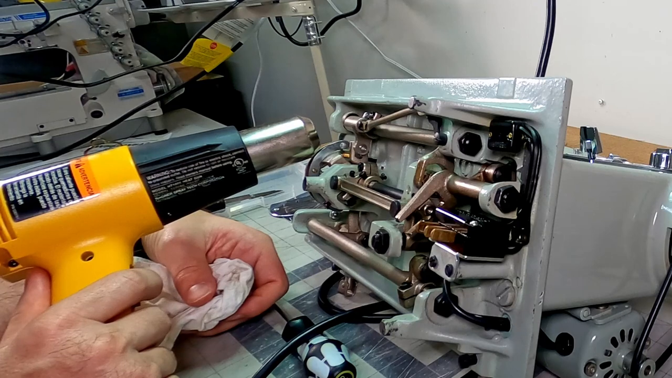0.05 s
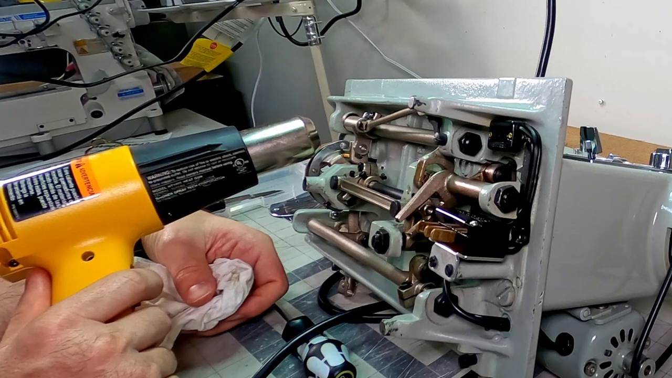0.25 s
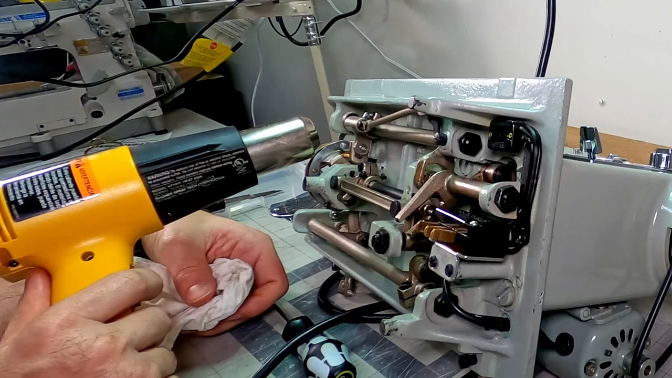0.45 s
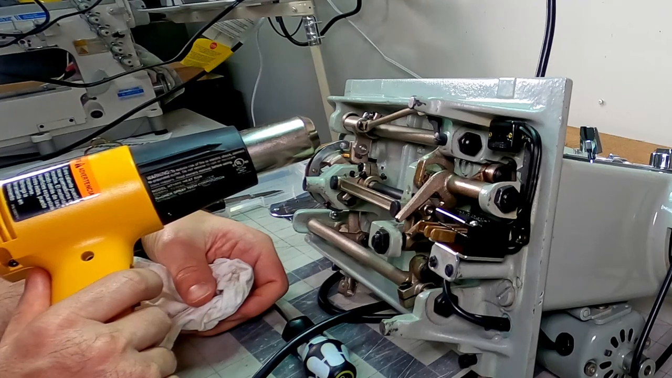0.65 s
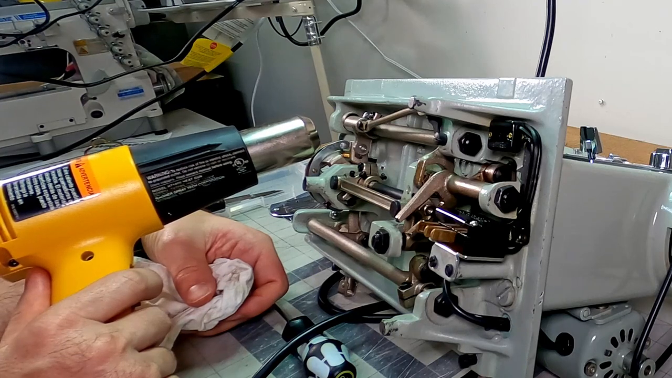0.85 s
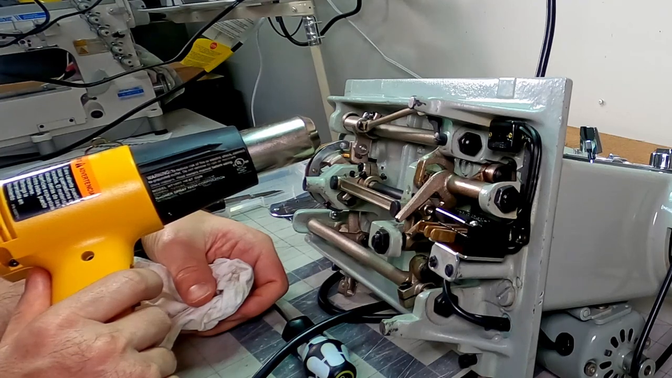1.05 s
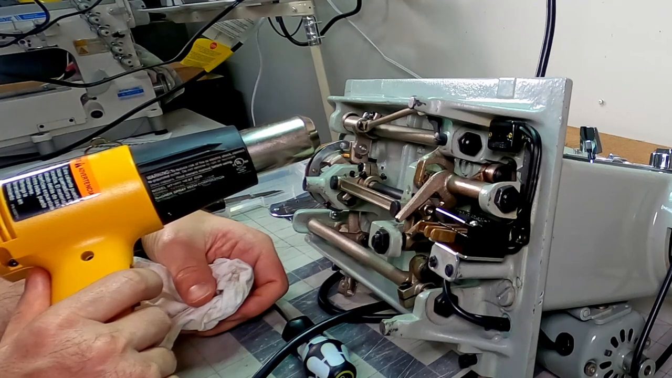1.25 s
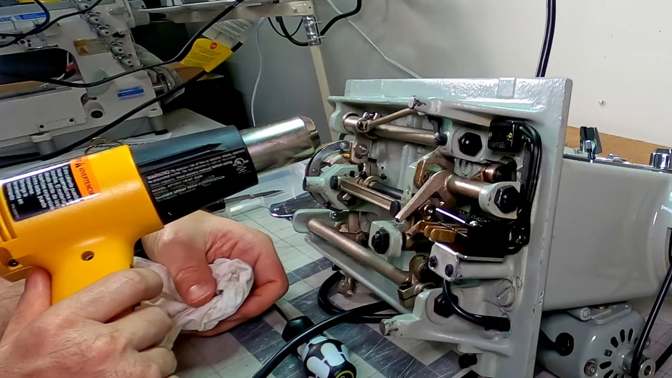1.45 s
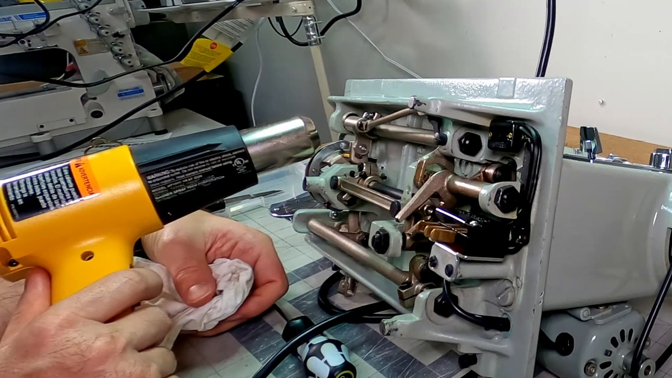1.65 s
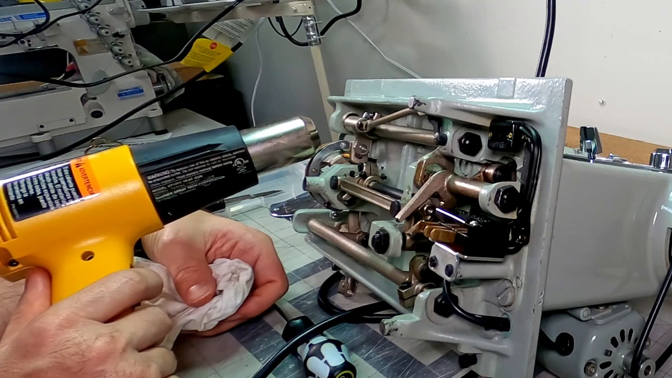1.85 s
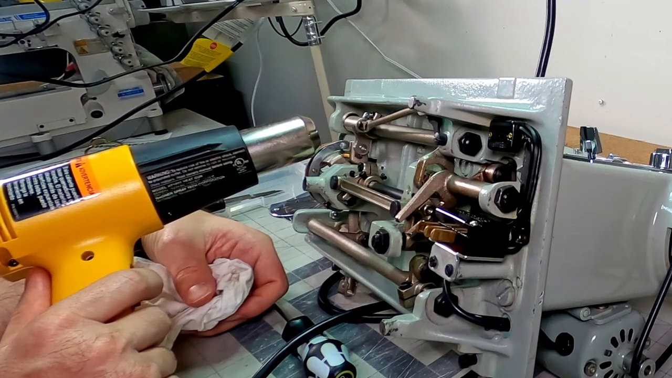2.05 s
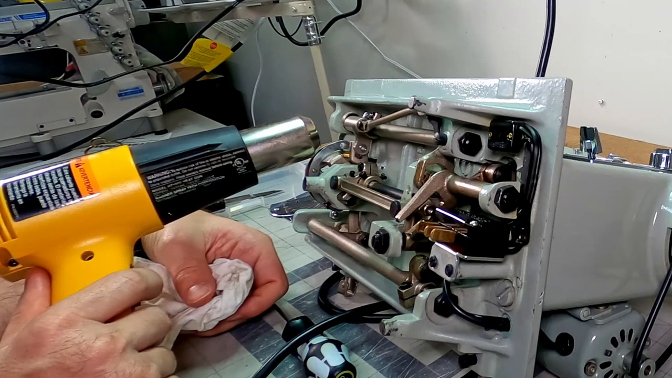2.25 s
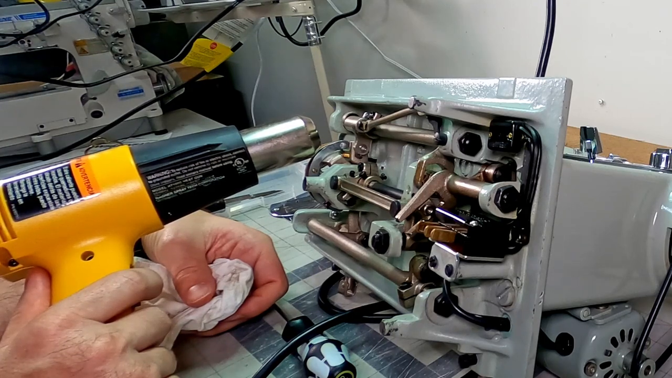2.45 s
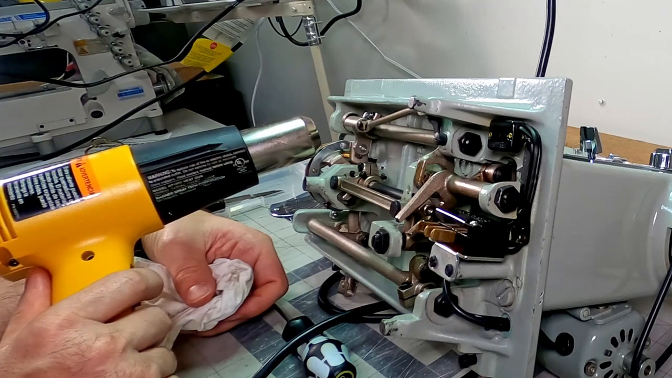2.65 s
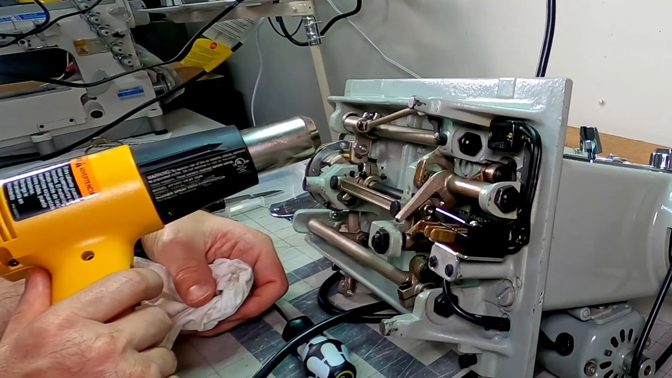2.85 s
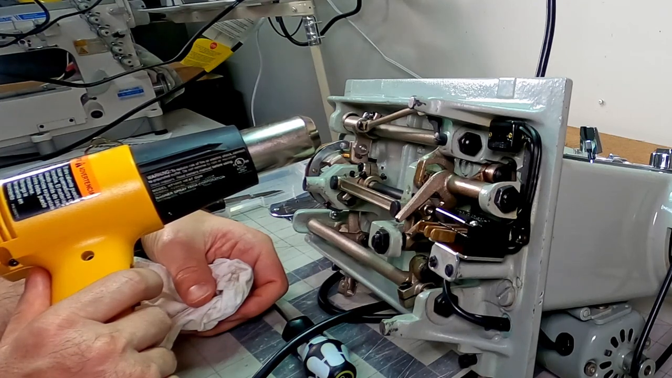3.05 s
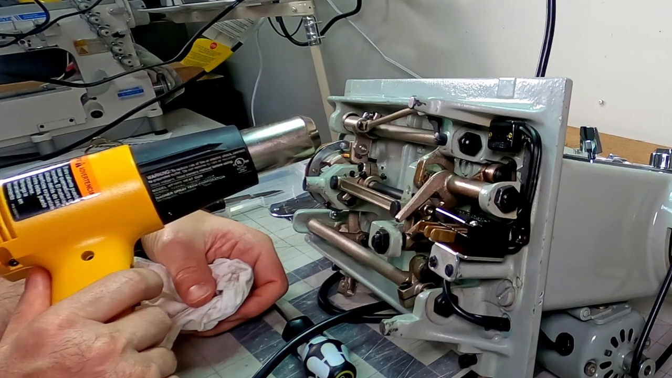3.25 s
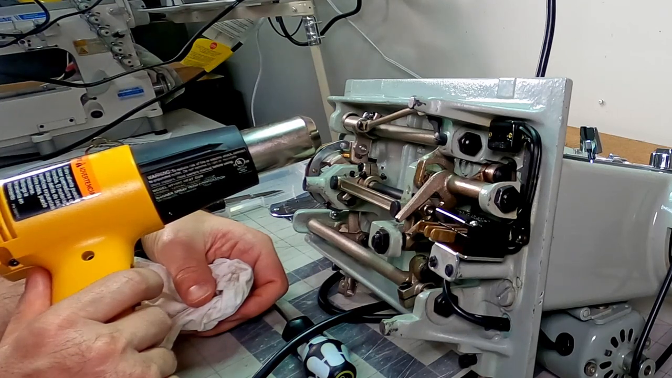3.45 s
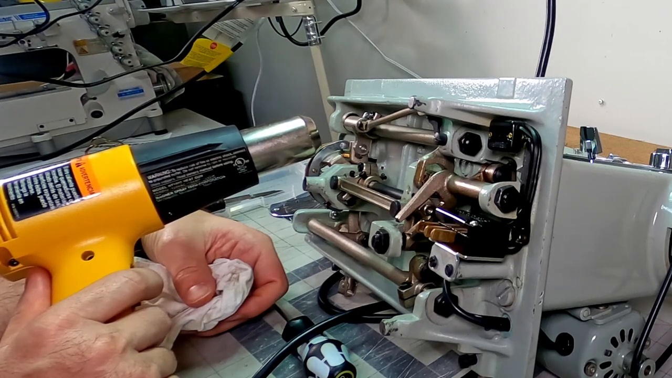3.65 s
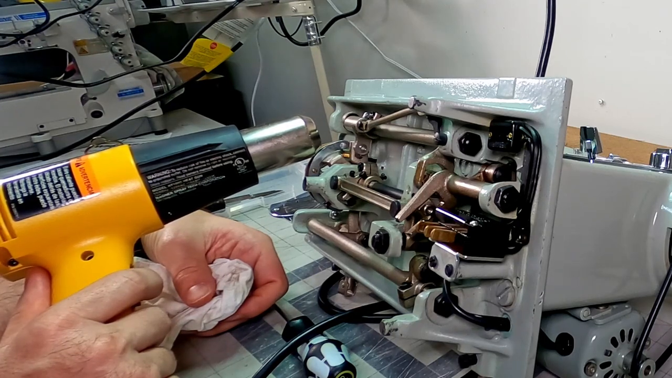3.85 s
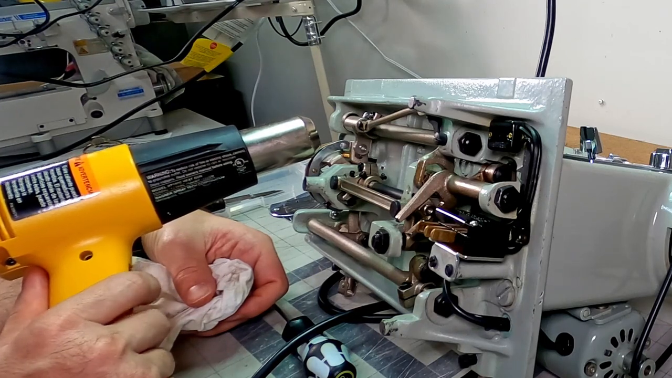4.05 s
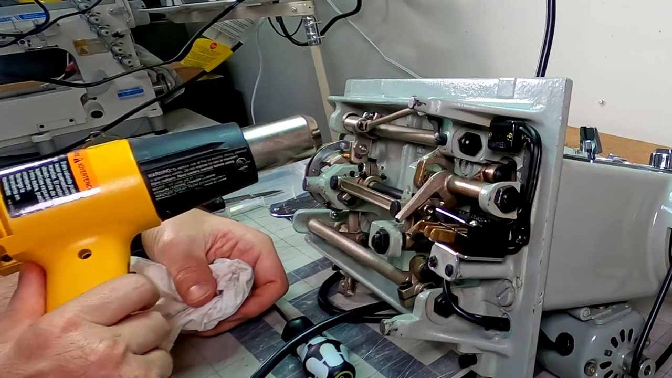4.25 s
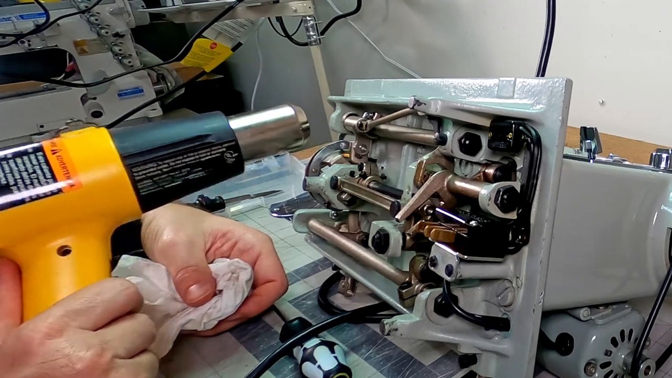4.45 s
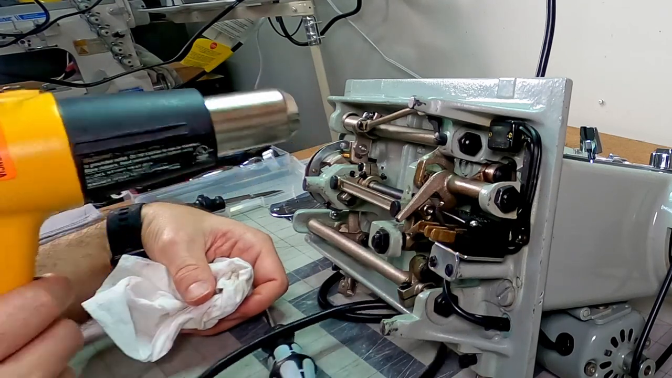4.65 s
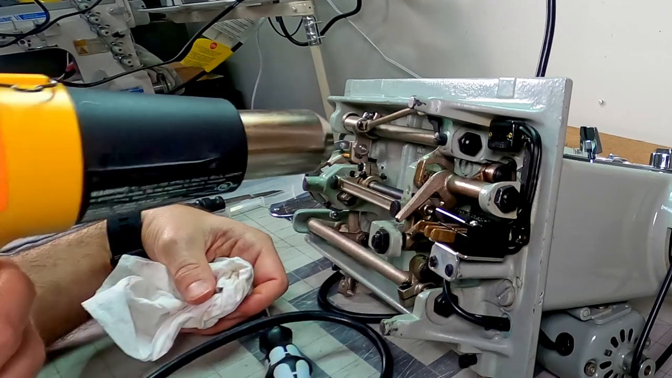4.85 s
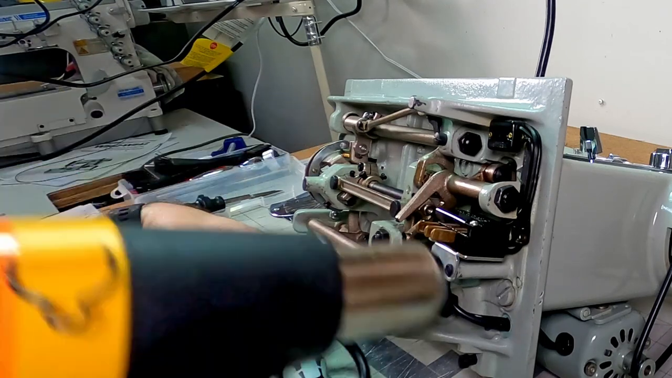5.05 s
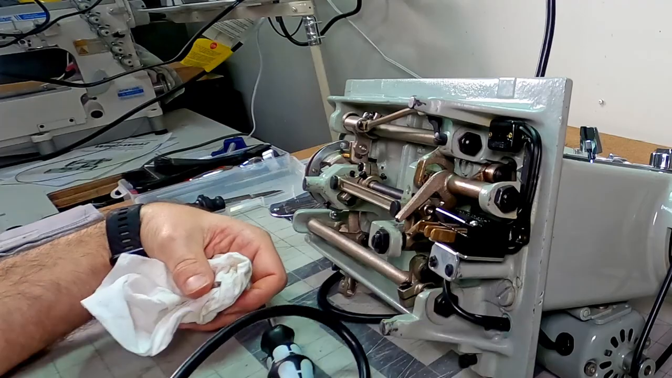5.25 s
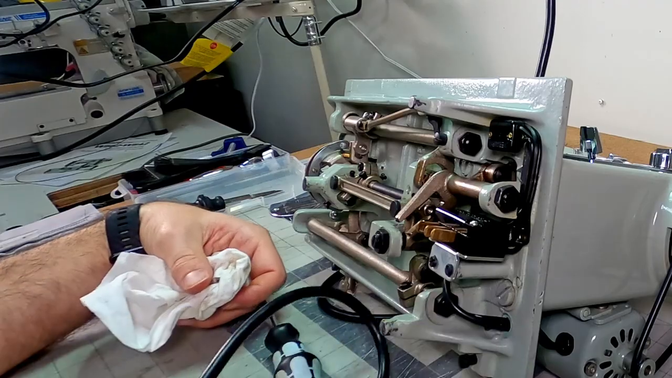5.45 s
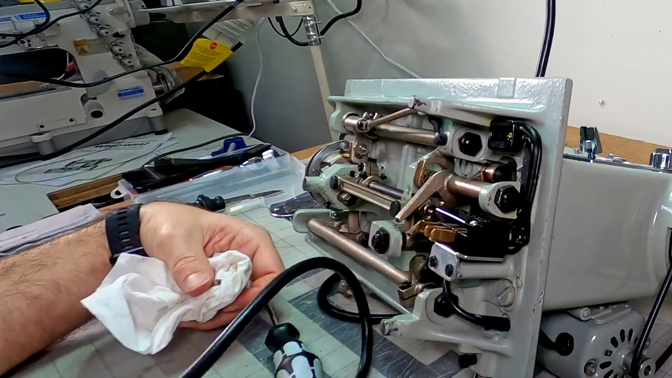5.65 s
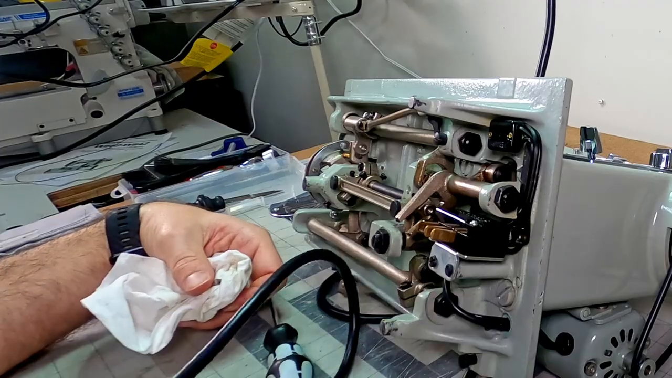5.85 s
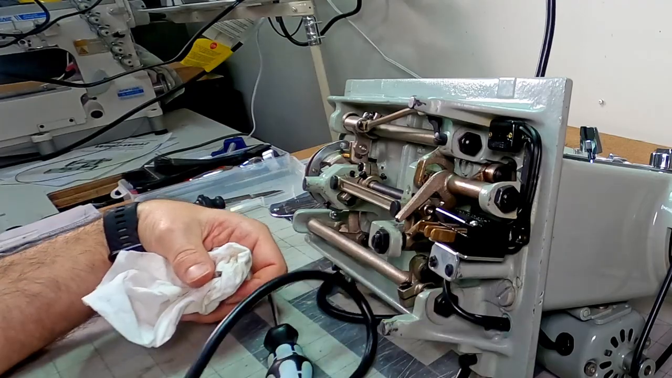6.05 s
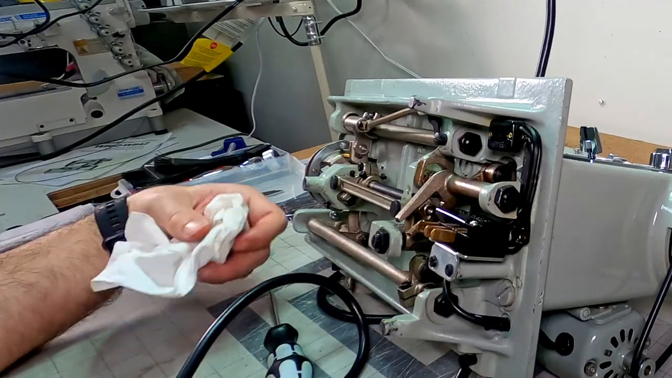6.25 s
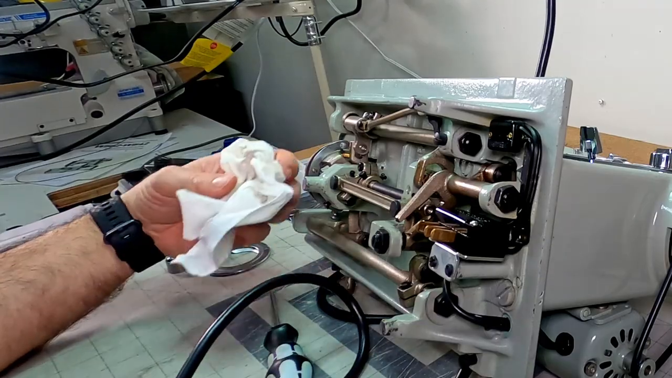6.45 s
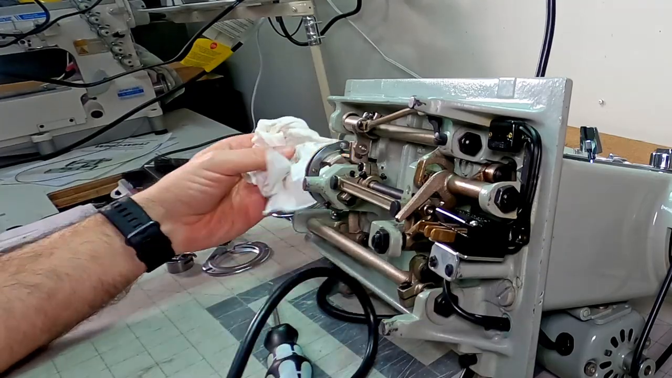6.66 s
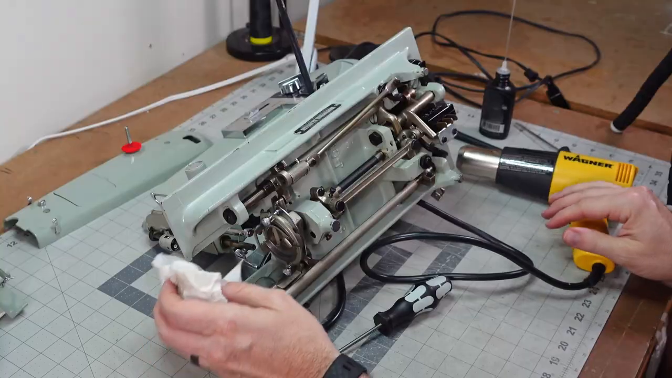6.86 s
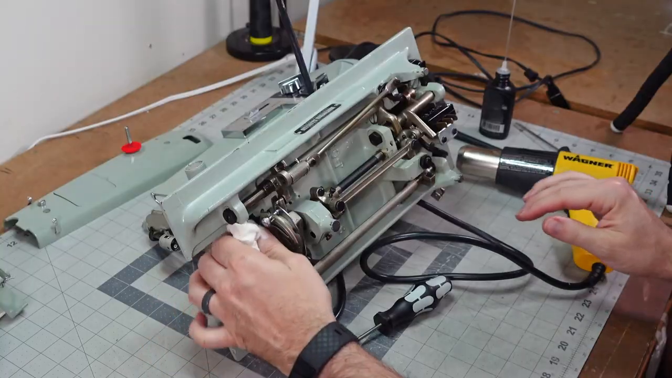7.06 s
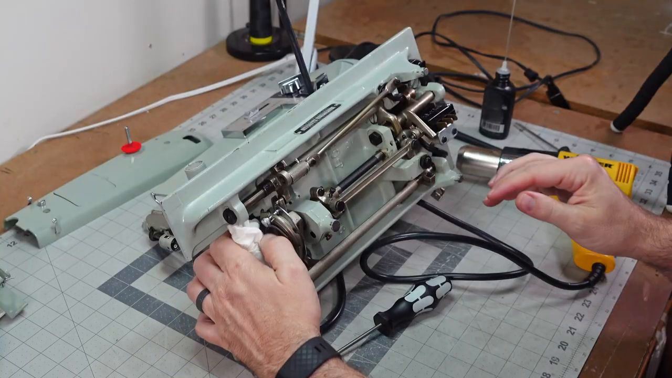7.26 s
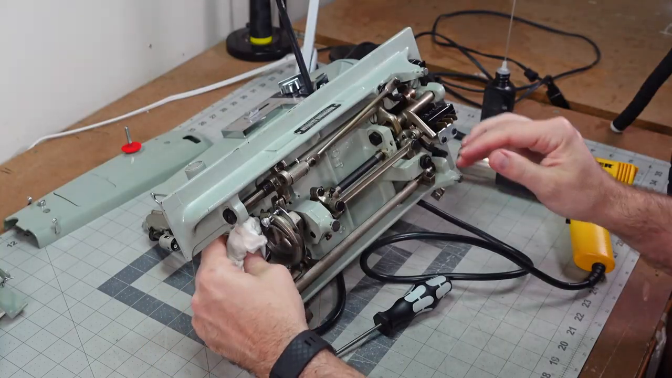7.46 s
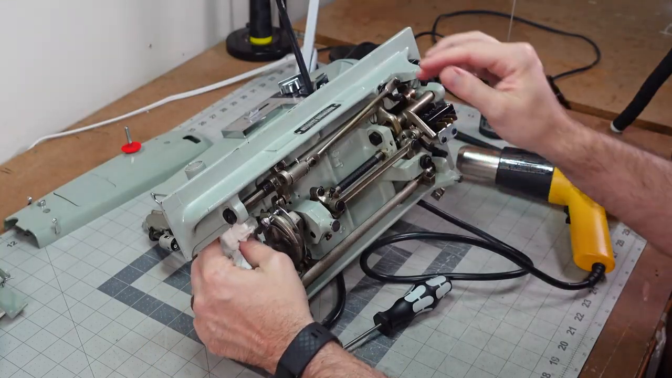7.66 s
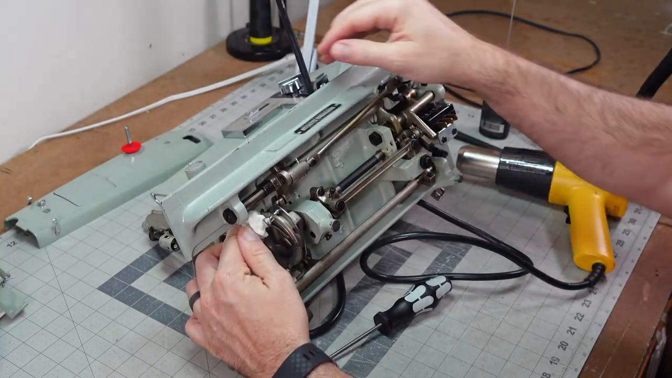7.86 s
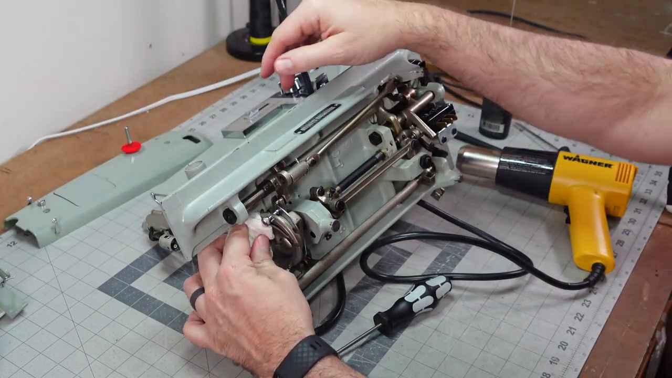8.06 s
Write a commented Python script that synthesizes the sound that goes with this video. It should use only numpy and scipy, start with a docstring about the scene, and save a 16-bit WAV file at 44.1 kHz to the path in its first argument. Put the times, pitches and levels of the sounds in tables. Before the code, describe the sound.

A heat gun blows steadily from the start, a rush of fan air and bright hiss in a plastic housing, with a thin motor whine. At about 4.4 seconds the grip clicks and a steel part ticks. The jet swells as the nozzle swings close past the microphone around 4.7 seconds, and the switch clicks sharply. Just before 5 seconds the motor cuts off and coasts down, its whine falling and fading within a second. A few light metal ticks follow. The gun's case clatters onto the bench at about 5.8 seconds, then gives a firm knock with a low thud at 6.1. From 6 to 8 seconds a tissue rustles softly over metal, with a faint, high, scratchy squeak around 7 seconds, a soft bump and a few more small ticks. A low workshop hum continues throughout, all heard in mono from beside the bench.

```python
"""A heat gun blows steadily at the works of a sewing machine on a workshop bench: fan air and rotor hiss
in a plastic housing, with a thin motor whine. Its jet swells as the nozzle swings close past the
microphone; it is switched off, coasts down and is laid on the bench with a clatter and a knock.
A tissue then rustles and squeaks over the metal. The room hums throughout; one microphone, mono."""
import sys
import numpy as np
from scipy import signal
from scipy.fft import rfft, irfft, next_fast_len
from scipy.io import wavfile
from scipy.ndimage import map_coordinates

SR = 44100
rng = np.random.default_rng(int(sys.argv[2]) if len(sys.argv) > 2 else 0)


def wrap_up_sound(samples):
    """Save the sound to the file named by the first command line argument, as 16-bit audio."""
    columns = np.atleast_2d(samples).T
    # keep every value between -1 and 1, then stretch to whole-number steps
    tamed = np.clip(columns, -1, 1)
    steps = np.round(tamed * 32767).astype(np.int16)
    wavfile.write(sys.argv[1], SR, steps)


N = 358088
TURNS_HZ = 57.97  # the motor at full speed

# broad spectrum of the air in the gun's housing: f/Hz, level/dB
AIR_SPECTRUM = [(200, -25), (460, -21.5), (560, -5), (820, -2.5), (930, -11.5), (1200, -9.5), (1500, -19.5),
                (3400, -26), (6000, -28.5), (9800, -33), (13500, -37.5), (15600, -34)]


def amp(db):
    """Decibels to gain."""
    return 10 ** (np.asarray(db) / 20)


def unit(x):
    """Scale to rms 1."""
    return x / np.sqrt(np.mean(x ** 2) + 1e-20)


def wobble(rate):
    """A smooth random curve, rate knots a second."""
    knots = rng.standard_normal(int(N * rate / SR) + 4)
    return map_coordinates(knots, [np.arange(N) * rate / SR])


def phase(hz):
    """Running phase of a moving frequency."""
    return 2 * np.pi * (np.cumsum(hz) / SR + rng.random())


def colour(x, spectrum, modes=(), tilt=0):
    """Causal filter of unit energy: a broad spectrum, resonances on it and a tilt in dB per octave."""
    m = 2 * next_fast_len(len(x) // 2 + SR // 10)
    hz = np.fft.rfftfreq(m, 1 / SR) + 1
    f, level = np.transpose(spectrum)
    db = np.interp(np.log(hz), np.log(f), level) + tilt * np.log2(np.maximum(hz, f[0]))
    for centre, width, lift in modes:
        db = db + lift * np.exp(-.5 * ((hz - centre) / width) ** 2)
    gain = unit(amp(db) * hz / np.hypot(hz, f[0] / 2))
    cepstrum = irfft(np.log(gain))[:m // 2]
    cepstrum[1:] *= 2  # minimum phase
    return irfft(rfft(x, m) * np.exp(rfft(cepstrum, m)))[:len(x)]


def split(x, hz, side):
    """The part of x below or above hz."""
    return signal.sosfilt(signal.butter(3, hz, side, fs=SR, output='sos'), x)


def rush(spectrum, modes=()):
    """Coloured noise of rms 1."""
    return unit(colour(rng.standard_normal(N), spectrum, modes))


def heat_gun(off_s=4.868, coast_s=.16, stop_s=.9, pass_s=4.71, pass_width_s=.175):
    """One motor drives air, whine and jet; once it is off, drag slows it, then friction stops it."""
    t = np.arange(N) / SR
    coasted = np.maximum(t - off_s, 0)
    friction = np.maximum(1 - (coasted / stop_s) ** 2, 1e-3)
    speed = friction / np.hypot(1, coasted / coast_s)  # share of full speed
    airflow = speed ** 5
    near = np.exp(-.5 * ((t - pass_s) / pass_width_s) ** 2)  # 1 closest to the microphone
    angle = phase(TURNS_HZ * speed * (1 + .0005 * wobble(3) + .0012 * wobble(40)))
    return fan_air(speed, airflow, angle) + motor_whine(speed, angle, near) + nozzle_jet(airflow, near)


def fan_air(speed, airflow, angle, rasp_share=.52, crossover_hz=2800):
    """Air rushes through the housing; in the treble, rotor hiss takes over and outlasts the airflow."""
    # housing resonances: f/Hz, width/Hz, lift/dB
    housing_modes = [(1756, 82, 3), (1912, 215, 8.5), (2517, 146, 6), (2980, 81, 3), (4020, 210, 5),
                     (5830, 450, 3.5), (6700, 98, -7.5), (6966, 380, 6), (7630, 92, 9.5), (8170, 190, 7),
                     (8000, 270, -1), (9230, 140, 3), (11730, 210, 4), (12080, 880, 6.5)]
    flow = rng.standard_normal(N)
    hiss = np.sqrt(1 - rasp_share) * flow + np.sqrt(rasp_share) * rotor_rasp(angle / (2 * np.pi))
    hiss *= 1 + .08 * np.cos(3 * angle)  # three pulses a turn
    body = airflow * split(flow, crossover_hz, 'low')
    treble = speed ** 1.55 * split(hiss, crossover_hz, 'high')
    return amp(-42.5 + .3 * wobble(9)) * colour(body + treble, AIR_SPECTRUM, housing_modes)


def rotor_rasp(turns):
    """The rotor rubs over the same rough track on every turn, so its hiss is a dense stack of lines."""
    track = rng.standard_normal(round(SR / TURNS_HZ))
    return unit(map_coordinates(track, [turns % 1 * len(track)], mode='grid-wrap'))


def motor_whine(speed, angle, near, judder_rad=.75, flutter_db=2.2):
    """Coasting, the motor's orders slide down through the housing's colour; the highest die first."""
    # whine lines: multiple of the turning rate, relative level/dB
    orders = [(15, -50.5), (18, -55), (24, -63), (33, -53.5), (36, -62), (45, -60.5), (51, -70), (60, -71),
              (84, -89), (91, -70.5), (118, -62), (121, -61.5), (124, -91), (202, -79)]
    air_hz, air_db = np.transpose(AIR_SPECTRUM)
    housing_db = lambda hz: np.interp(np.log(hz), np.log(air_hz), air_db)
    whine = 0
    for order, db in orders:
        loss = (1 - speed) * (order - orders[0][0])  # at rest, 1 dB per order above the lowest
        slide = housing_db(order * TURNS_HZ * speed) - housing_db(order * TURNS_HZ)
        gain = amp(db + flutter_db * wobble(45) + slide - loss)
        whine += gain * np.sin(order * angle + judder_rad * wobble(55))
    return np.sqrt(2) * amp(-1 - .5 * near) * speed ** 1.4 * whine


def workshop(hum_hz=56.3, hum_db=-65, room_db=-51):
    """Room tone: a running appliance hums, and its noise stirs the low modes of the room."""
    # room tone: f/Hz, level/dB; room modes: f/Hz, width/Hz, lift/dB
    room_tone = [(20, -14), (45, -24.5), (80, -12), (130, -6), (450, -6.5), (680, -5), (780, -0.5),
                 (1150, -1), (1350, -7.5), (2500, -15), (4300, -22.5), (9000, -29.5), (15600, -35)]
    room_modes = [(115.6, 10.6, 15.5), (154.2, 1.2, 17), (177.6, 3.2, 13.4), (229.4, 12.4, 11.8),
                  (294.6, 5.8, 11.5), (347, 21, 7.4), (410.2, 11.7, 8.4)]
    hum = np.sqrt(2) * amp(hum_db + .4 * wobble(5)) * np.sin(phase(np.full(N, hum_hz)))
    return hum + amp(room_db + .12 * wobble(12)) * rush(room_tone, room_modes)


def nozzle_jet(airflow, near, jet_db=-38, echo_far_ms=2.2, echo_near_ms=1.48):
    """The jet is heard only close to the microphone, with echoes off the nearby surfaces."""
    # jet noise: f/Hz, level/dB; nozzle resonances: f/Hz, width/Hz, lift/dB
    jet_spectrum = [(300, -9.5), (520, -3.5), (800, -0.5), (1400, 1.5), (1650, -13.5), (2700, -5.5),
                    (3200, -21), (4000, -13.5), (7500, -15.5), (9000, -27), (12500, -29), (15600, -28)]
    nozzle_modes = [(790, 8.3, 14), (1360, 72, 1), (2580, 68, 2), (3660, 180, 10.5), (4900, 200, -4),
                    (7600, 330, 2.5)]
    echo_ms = echo_far_ms + (echo_near_ms - echo_far_ms) * near
    jet = swinging_echo(rush(jet_spectrum, nozzle_modes), echo_ms)  # off the bench
    jet = unit(swinging_echo(jet, 2.7 * echo_ms))  # off the machine
    return amp(jet_db) * near * airflow * jet


def swinging_echo(x, delay_ms):
    """An echo whose path changes as the gun moves: its comb sweeps through the noise."""
    at = np.arange(N) - delay_ms * SR / 1000
    return x + .42 * map_coordinates(x, [at], order=3)


def strikes(rows, spectrum, modes, crack_t60, ring_db, ring_t60):
    """Each contact is a short crack and a longer ring of body and room, in the struck thing's colour."""
    out, t = np.zeros(N + SR), np.arange(SR // 2) / SR
    fade = amp(-60 * t / crack_t60) + amp(ring_db - 60 * t / ring_t60)
    for s, db, tilt in rows:
        hit = colour(fade * rng.standard_normal(len(t)), spectrum, modes, tilt)
        out[round(s * SR):][:len(t)] += amp(db) * hit
    return out[:N]


def switch_clicks():
    """The plastic grip and switch click in the hand."""
    # contacts: t/s, level/dB, tilt/(dB/octave)
    clicks = [(4.367, -40, -1), (4.403, -31.5, 0.5), (4.786, -26.5, 2), (4.793, -21, 1), (4.854, -31, 0.5),
              (4.868, -39, 2)]
    # struck plastic: f/Hz, level/dB; its resonances: f/Hz, width/Hz, lift/dB
    plastic = [(200, -25), (900, -17), (1900, 2.5), (4500, -1), (7000, 1), (9500, -6), (15600, -12)]
    plastic_modes = [(2160, 54, 7.9), (3300, 170, 2.5), (5240, 120, 3.8)]
    return strikes(clicks, plastic, plastic_modes, crack_t60=.018, ring_db=-15.5, ring_t60=.16)


def steel_ticks():
    """Small steel parts tick, each ringing at its own pitch."""
    # contacts: t/s, level/dB, tilt/(dB/octave), ring f/Hz
    ticks = [(4.428, -25.5, -3.5, 2150), (5.278, -57, -2, 3820), (5.444, -48.5, 1, 8700),
             (5.539, -41.5, -6, 2060), (5.632, -37, -4, 11100), (5.722, -47, -3, 9100),
             (6.541, -37, 1, 2740), (7.641, -46, -4.5, 10700), (7.78, -59, -2, 10900),
             (8.105, -36, 4.5, 13200)]
    # struck steel: f/Hz, level/dB; its resonances: f/Hz, width/Hz, lift/dB
    steel = [(400, -5), (1200, 14), (2500, 11.5), (6000, 7), (10000, 2), (15600, -1)]
    steel_modes = [(4560, 230, 5.4), (7400, 260, 4.8), (13000, 1300, 11.4)]
    return sum(strikes([(s, db, tilt)], steel, steel_modes + [(hz, 300, 12)],
                       crack_t60=.011, ring_db=-15.5, ring_t60=.34) for s, db, tilt, hz in ticks)


def laying_down():
    """The gun's case clatters down and knocks the bench, which booms under every blow."""
    # contacts: t/s, level/dB, tilt/(dB/octave)
    case_hits = [(5.77, -37.5, 1), (5.794, -32.5, 4), (5.801, -33.5, 3), (5.817, -30, 2.5),
                 (5.824, -29, -4), (5.841, -45, 11), (5.86, -36, 1)]
    bench_hits = [(6.129, -21.5, 5.2), (6.136, -21.5, -2.2), (7.105, -46, -2)]
    # spectra of the struck bodies: f/Hz, level/dB
    case = [(40, -16), (90, -6), (300, 5), (700, 8), (1000, 2.5), (2700, -4.5), (4500, -11.5), (9000, -25),
            (15600, -32)]
    bench = [(40, -22), (85, 6.5), (170, -9), (330, 4), (480, 9), (700, 5.5), (1050, 4), (2700, -2),
             (7500, -14.5), (15600, -27)]
    # their resonances and the bench's low boom: f/Hz, width/Hz, lift/dB
    case_modes = [(451, 45, 9), (1320, 68, 8), (2120, 140, 7.1), (2700, 190, 5.6), (3900, 90, 3.6)]
    bench_modes = [(342, 32, 5), (610, 65, 10.4), (780, 39, 4.8), (1495, 61, 4.3), (2460, 100, 3.4),
                   (4650, 150, 5), (7400, 250, 4.8)]
    boom = [(93, 17, 12), (230, 27, 7.9)]
    clatter = strikes(case_hits, case, case_modes + boom, crack_t60=.028, ring_db=-12, ring_t60=.29)
    knock = strikes(bench_hits, bench, bench_modes + boom, crack_t60=.011, ring_db=-10.5, ring_t60=.17)
    return clatter + knock


def tissue():
    """Paper fibres rustle over the metal and give a thin, scratchy squeak with a weaker upper strand."""
    # wipes of tissue and sleeve, and squeaks: start t/s, length/s, level/dB
    wipes = [(6.01, 0.091, -57), (6.3, 0.12, -63), (6.59, 0.23, -49), (6.92, 0.19, -61), (7.5, 0.18, -61.5),
             (7.755, 0.058, -57.5)]
    squeaks = [(6.77, 0.29, -67), (7.07, 0.088, -67), (7.15, .15, -78)]
    # pitch of the squeaks: t/s, f/Hz
    squeak_pitch = [(6.78, 10300), (6.86, 11400), (7.0, 10650), (7.12, 10600), (7.3, 10100)]
    # paper rustle: f/Hz, level/dB
    paper = [(500, -4.5), (1200, -6), (2600, -6.5), (5500, -13), (9000, -18), (15600, -17)]
    rustle = strokes(wipes) * amp(1.1 * wobble(160) + 1.8 * wobble(1500)) * rush(paper)
    hz = np.interp(np.arange(N) / SR, *np.transpose(squeak_pitch))
    strand = lambda f: amp(2.8 * wobble(60)) * np.sin(phase(f + 110 * wobble(30) + 170 * wobble(900)))
    return rustle + strokes(squeaks) * (strand(hz) + .55 * strand(1.08 * hz))


def strokes(rows):
    """Each stroke of the hand swells and fades in one arch."""
    t = np.arange(N) / SR
    return sum(amp(db) * np.sin(np.pi * np.clip((t - s) / length, 0, 1)) for s, length, db in rows)


def scene():
    """All sources meet at one microphone by the bench, the same in both channels."""
    mono = heat_gun() + workshop() + switch_clicks() + steel_ticks() + laying_down() + tissue()
    return np.array([mono, mono])


def record(dry, top_hz=15850):
    """The microphone chain cuts off steeply at its band limit."""
    m = next_fast_len(N + SR // 2)
    hz = np.fft.rfftfreq(m, 1 / SR)
    return irfft(rfft(dry, m) / (1 + (hz / top_hz) ** 160), m)[:, :N]


dry = scene()
out = record(dry)
wrap_up_sound(out)
```